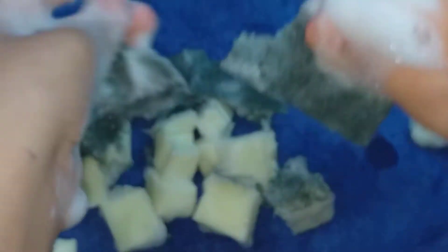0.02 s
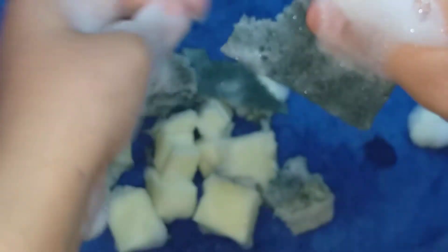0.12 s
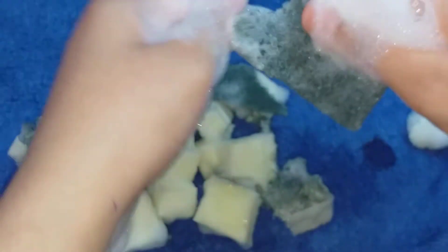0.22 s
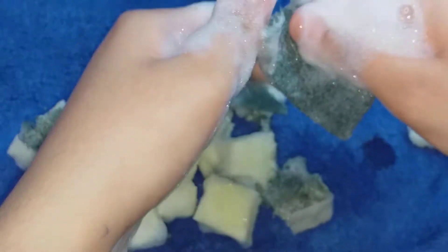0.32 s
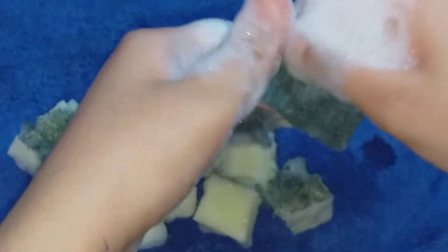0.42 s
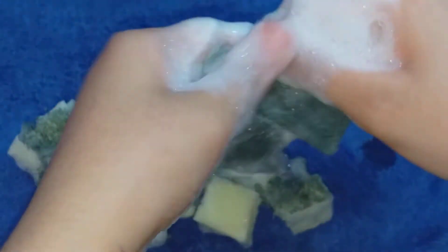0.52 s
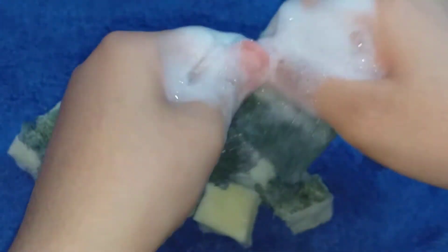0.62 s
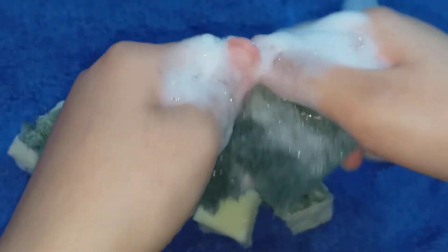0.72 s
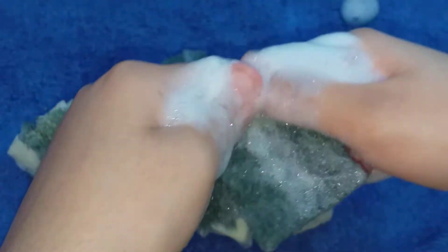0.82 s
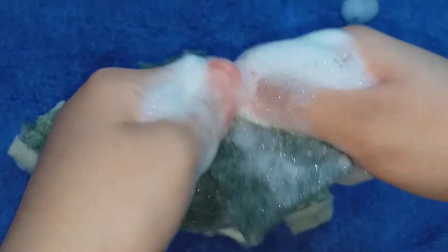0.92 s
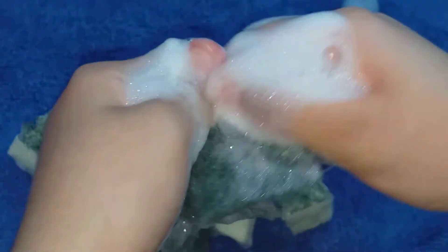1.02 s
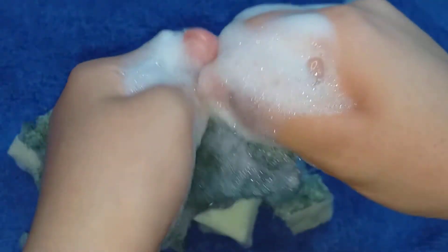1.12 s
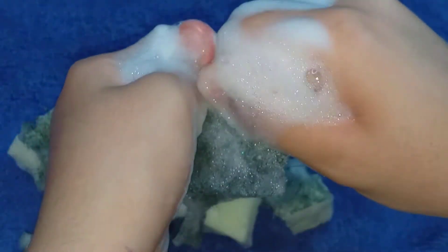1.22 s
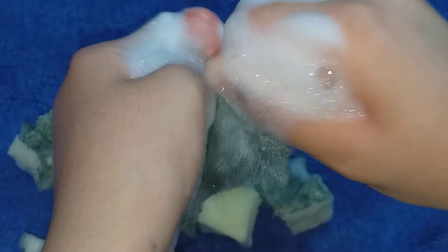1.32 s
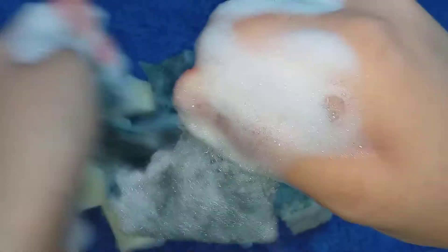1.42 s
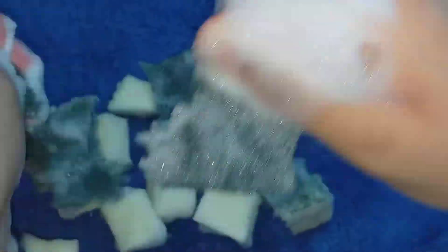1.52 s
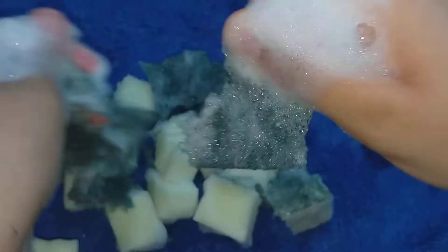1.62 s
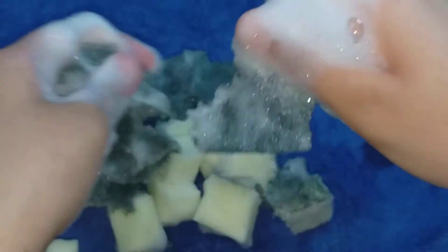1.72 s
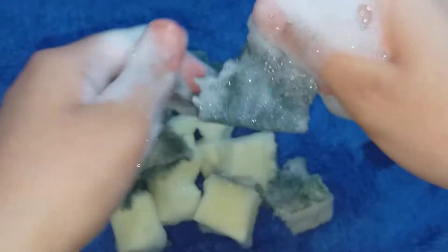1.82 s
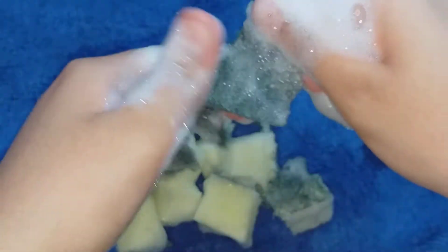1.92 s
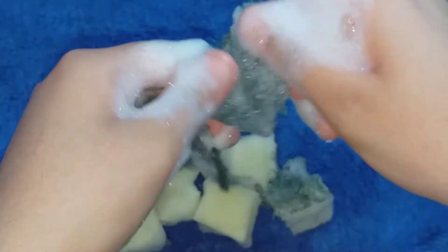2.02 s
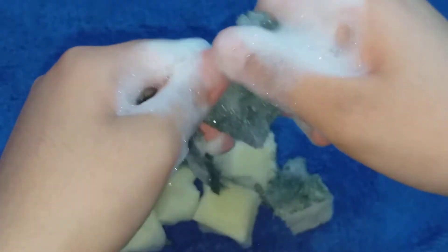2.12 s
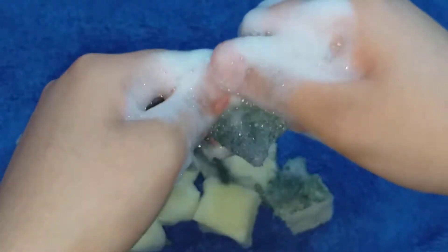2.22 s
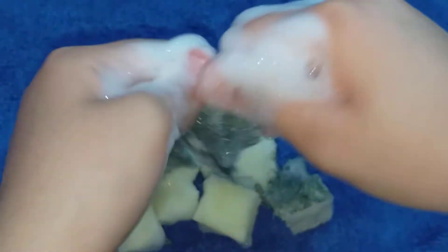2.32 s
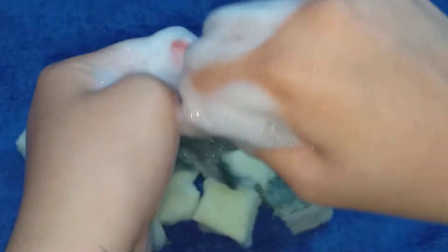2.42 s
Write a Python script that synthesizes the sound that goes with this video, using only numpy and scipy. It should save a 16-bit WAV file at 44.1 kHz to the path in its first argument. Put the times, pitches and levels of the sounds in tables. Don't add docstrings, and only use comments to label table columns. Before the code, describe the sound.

A soapy scouring pad is torn close up. Plastic handling creaks start at once, peaking in a loud clack and thump near 0.28 s, with later creaks at 0.4 and 0.48. Small ticks run from 0.6 to 1.1. Fibres crackle from 1.15, then rip densely at 1.37-1.46, turning brighter. Quiet foam fizz, squishes, low rumble, hiss and faint buzz continue; weak snaps return after 2.35.

```python
import sys
import numpy as np
from scipy import signal
from scipy.fft import rfft, irfft, next_fast_len
from scipy.io import wavfile
from scipy.ndimage import uniform_filter1d, map_coordinates

SR = 44100
rng = np.random.default_rng(int(sys.argv[2]) if len(sys.argv) > 2 else 0)


def boost(x):
    u = np.asarray(x, float) / 20
    return 10 ** u


def master(y):
    cut = np.clip(np.atleast_2d(y).T, -1, 1)
    pcm = np.round(cut * 32767)
    wavfile.write(sys.argv[1], SR, pcm.astype(np.int16))


N = 110250
TIME = np.arange(N) / SR
TOP_HZ = 16000
SILENT_DB = -140

# f/Hz, width/Hz, level/dB
BRIGHT_MODES = [(7010, 350, 11), (8040, 230, 5)]


def unit(x):
    return x / np.sqrt(np.mean(x ** 2) + 1e-20)


def noise():
    return rng.standard_normal(N)


def along(points, hz):
    f, v = np.transpose(points)
    return np.interp(np.log(hz + 1), np.log(f + 1), v)


def curves(rows, off=None):
    s, *columns = np.transpose(rows)
    return [np.interp(TIME, s, column, off, off) for column in columns]


def wobble(rate):
    knots = rng.standard_normal(int(N * rate / SR) + 4)
    return map_coordinates(knots, [np.arange(N) * rate / SR])


def filtered(x, response):
    m = next_fast_len(N + 8192)
    return irfft(rfft(x, m) * response(np.fft.rfftfreq(m, 1 / SR)), m)[..., :N]


def coloured(x, points):
    spectrum = boost(along(points, np.fft.rfftfreq(4096, 1 / SR)))
    cepstrum = irfft(np.log(spectrum + 1e-5))
    cepstrum[1:2048] = 2 * cepstrum[1:2048]
    cepstrum[2049:] = 0
    h = irfft(np.exp(rfft(cepstrum)))
    return signal.fftconvolve(x, h / np.linalg.norm(h))[:N]


def ringing(x, modes):
    def body(f):
        total = 0
        for k, (centre, width, db) in enumerate(modes):
            loss = 1j * f * width
            total = total + (-1) ** k * boost(db) * loss / (centre * centre - f * f + loss)
        return total

    peak = np.abs(irfft(body(np.fft.rfftfreq(8192, 1 / SR)))).max()
    return filtered(x, body) / peak


def hits(times, level_db):
    return np.bincount((times * SR).astype(int), boost(level_db), N)


def grains(rate, spread_db):
    chance, sign, size = rng.random((3, N))
    sizes = boost(-spread_db * np.log(size + 0.0029))
    return unit((chance < rate / SR) * np.sign(sign - .5) * sizes)


def patchy(x, size, db):
    z = signal.stft(x, nperseg=size)[2]
    field = uniform_filter1d(rng.standard_normal(z.shape), size=5, axis=0)
    field = uniform_filter1d(field, size=3, axis=1)
    return signal.istft(z * boost(db * unit(field)), nperseg=size)[1][:N]


def background():
    # t/s, level/dB
    rumble_level = [(0, -69.5), (.7, -70), (1.0, -69), (1.3, -70), (1.9, -73), (2.4, -71)]
    # f/Hz, level/dB per Hz
    rumble_colour = [(25, -33.5), (54, -4.5), (86, -14), (134, 2.5), (172, -11.5), (260, -15), (500, -30.5),
                     (1000, -69)]
    # f/Hz, level/dB per Hz
    hiss_colour = [(300, -15.5), (1500, -14), (6200, -7), (9500, -7.5), (13500, -12), (16000, -7.5)]
    hum_hz, hum_db, hiss_db = 258, -83, -77
    level_db, = curves(rumble_level)
    rumble = boost(level_db + 3 + 2.0 * wobble(5.78)) * unit(coloured(noise(), rumble_colour))
    hum_phase = 2 * np.pi * hum_hz * TIME + .6 * wobble(12)
    hum = boost(hum_db + 1.7 * wobble(3.76)) * np.sin(hum_phase)
    return rumble + hum + boost(hiss_db) * coloured(noise(), hiss_colour)


def buzz():
    # f/Hz, level/dB
    buzz_colour = [(500, -31.5), (1500, -5), (4000, -2), (9000, 0), (12000, 2), (15000, -20)]
    frame_hz, level_db = 59.849, -72
    step_s, first_s, wide_s = .003275, -.00034, .00016
    hz = frame_hz * np.arange(1, int(TOP_HZ / frame_hz))
    starts = first_s + step_s * np.arange(5)
    five = np.exp(-2j * np.pi * hz[:, None] * starts).sum(1)
    edges = 1 - np.exp(-2j * np.pi * hz * wide_s)
    lines = five * edges * boost(along(buzz_colour, hz))
    frame = irfft(np.r_[0, lines], 8192)
    return boost(level_db) * unit(np.interp(TIME * frame_hz % 1, np.arange(8192) / 8192, frame))


def foam():
    # t/s, level/dB
    foam_level = [(0, -67.5), (.6, -70.5), (.95, -72), (1.15, -70), (1.5, -69), (1.72, -70.5),
                  (1.95, -76.5), (2.3, -73.5), (2.46, -69.5)]
    # f/Hz, level/dB per Hz
    fizz_colour = [(180, -34), (300, -9), (961, -5.5), (2400, -5.5), (2880, -5.5), (3580, 0.5),
                   (5900, -10.5), (9390, -1), (16000, -13)]
    # t/s, level/dB, f/Hz, length/s
    squishes = [
        (0.505, -63, 3450, 0.0013),
        (0.586, -75.5, 4100, 0.0041),
        (0.766, -73.5, 2180, 0.012),
        (1.124, -73, 3750, 0.0073),
        (2.164, -77, 2010, .02),
    ]
    sway_db = 1.3
    level_db, = curves(foam_level)
    pops = patchy(grains(4000, spread_db=2.0) + 0.63 * noise(), size=256, db=2.5)
    sway = sway_db * (wobble(17) + wobble(81))
    out = boost(level_db + sway + 1.0) * unit(coloured(pops, fizz_colour))
    for s, db, hz, length in squishes:
        swell = np.exp(-((TIME - s) / length) ** 2 + .5 * wobble(150))
        wet = filtered(pops, lambda f: np.exp(-(np.log(f / hz + 1e-9) / 0.3) ** 2))
        out = out + boost(db) * swell * unit(wet)
    return out


def bursts(times, gains, lengths, count):
    fade = .54
    u = rng.random((len(times), count, 2))
    late = u[..., 0] * (np.arange(count) > 0)
    at = (np.asarray(times)[:, None] + np.asarray(lengths)[:, None] * late) * SR
    size = np.asarray(gains)[..., None] * (0.65 + 0.45 * u[..., 1])
    size = size * (1 - fade * late) * (-1.) ** np.arange(count)
    return [np.bincount(at.astype(int).ravel(), g.ravel(), N) for g in size]


def shell(x, hz):
    wide = [(hz, 1490, 0)]
    narrow = [(hz * 0.93, 260, 0)]
    return ringing(ringing(x, wide), wide) + boost(-13) * ringing(x, narrow)


def creaks():
    # t/s, peak/dB, shell f/Hz, bright ring/dB, hollow ring/dB
    creak_events = [
        (0.0141, -38.5, 4400, 9.5, -5.5),
        (0.0727, -31, 4340, 3, -1),
        (0.1492, -46, 3700, 7, -4.5),
        (0.206, -25.5, 3690, -2, -6),
        (.216, -35, 4400, -17, 3),
        (.275, -14.5, 4630, -12, -6.5),
        (0.28, -12, 4440, -8.5, -17),
        (0.401, -26.5, 4520, -1.5, -6),
        (0.4803, -34, 4100, 0.5, -4.5),
        (0.2817, -22.5, 4500, -8, -20),
    ]
    slip_lengths = [.002, .0025, .001, .0012, .002, .0002, .0002, .0028, .0018, .0003]
    # bright f/Hz, middle hollow level/dB, upper hollow level/dB, crack level/dB
    creak_tones = [(7000, -3.5, 0.5, -18), (7000, -0.5, -2.5, -18), (7100, -1, 2, -13),
                   (6220, -6.5, 2, -14), (7000, -8, -3, -24), (7000, 0, 3, -20), (7500, 0, 3, -9.5),
                   (6200, -3.5, 4, -15), (6970, 4, 0.5, -18), (6892, 0.5, -0.5, -25)]
    # f/Hz, width/Hz
    hollow_modes = [(810, 240), (1420, 260), (2250, 498.5)]
    crack_t60 = 0.0056
    s, db = np.transpose(creak_events)[:2]
    slips = bursts(s, boost(db - 200 * (1 - np.eye(len(s)))), slip_lengths, count=4)
    decay = boost(-60 * np.arange(SR // 20) / SR / crack_t60)
    out = 0
    for x, event, tone in zip(slips, creak_events, creak_tones):
        hz, bright_db, hollow_db = event[2:]
        top_hz, middle_db, upper_db, crack_db = tone
        bright = ringing(x, [(top_hz, *BRIGHT_MODES[0][1:]), BRIGHT_MODES[1]])
        hollow = ringing(x, np.c_[hollow_modes, [0, middle_db, upper_db]])
        crack = signal.fftconvolve(np.abs(x), decay)[:N] * noise()
        out = out + boost(-8) * shell(x, hz) + boost(bright_db) * bright
        out = out + boost(hollow_db) * hollow + boost(crack_db) * crack
    return out


def ticks():
    # t/s, peak/dB, bright ring/dB, hollow ring/dB
    tick_events = [
        (0.6217, -47, -17.5, -4),
        (.689, -59, -6, 4),
        (.698, -55.5, -4, 5.5),
        (.708, -57.5, 1, 7),
        (0.7958, -54.5, -11.5, -1),
        (0.8408, -63, -5, -4),
        (0.887, -53.5, -7.5, -9.5),
        (0.982, -74, -15, 3),
        (1.048, -50, -12, -4),
        (1.0833, -59.5, -21.5, -3),
    ]
    # f/Hz, width/Hz, level/dB
    box_modes = [(997, 92, 3.5), (1460, 210, -13.5)]
    s, db, bright_db, box_db = np.transpose(tick_events)
    slip_s = s * 0 + 0.0013
    body, bright = bursts(s, boost([db, db + bright_db + 14]), slip_s, count=3)
    box = ringing(hits(s, db + box_db + 1), box_modes)
    return boost(-9) * shell(body, 4520) + ringing(bright, BRIGHT_MODES) + box


def thumps():
    # t/s, thump/dB, knock/dB
    rocks = [
        (0.0146, -42.5, -44),
        (.073, -47, -40),
        (.2062, -38, -28),
        (0.2158, -45, -32.5),
        (0.2752, -22, -25),
        (0.2841, -26.5, -42),
        (0.401, -36, -31.5),
        (0.481, -51, -39.5),
        (1.417, -52, -44),
        (1.461, -41.5, -54),
    ]
    s, thump_db, knock_db = np.transpose(rocks)
    thump = ringing(hits(s, thump_db), [(104, 65, 0)])
    return thump - ringing(hits(s, knock_db), [(350, 320, 0)])


def mount():
    rattle = filtered(creaks() + ticks(), lambda f: 1 / (1 + 1j * f / 12400) ** 4)
    return rattle + filtered(thumps(), lambda f: 1 / (1 + 1j * f / 510) ** 2)


def room(x):
    # f/Hz, t60/s
    room_t60 = [(200, 0.083), (2000, 0.32), (10000, 0.17)]
    hz, t, z = signal.stft(rng.standard_normal(SR // 2), SR, nperseg=256)
    fading = z * boost(-60 * t / along(room_t60, hz)[:, None])
    tail = signal.istft(fading, SR, nperseg=256)[1]
    return signal.fftconvolve(x, tail / np.linalg.norm(tail))[:N]


def breaks(rows, t60, gain_db):
    s, db, bright_db = np.transpose(rows)
    decay = boost(gain_db - 60 * np.arange(SR // 30) / SR / t60)
    coarse_shape = signal.fftconvolve(hits(s, db), decay)[:N]
    bright_shape = signal.fftconvolve(hits(s, db + bright_db), decay)[:N]
    clicks = grains(14000, spread_db=1.5)
    return coarse_shape * clicks, bright_shape * unit(clicks + .6 * noise())


def clumps(rate, db):
    return boost(db * wobble(rate))


def stretching():
    # t/s, level/dB
    strain_level = [
        (1.15, -84),
        (1.17, -59),
        (1.184, -64.5),
        (1.205, -53),
        (1.24, -57.5),
        (1.272, -55),
        (1.29, -60),
        (1.355, -69.5),
    ]
    # t/s, level/dB
    grip_level = [(2.33, -85), (2.38, -72), (2.465, -68.5), (2.5, -72)]
    # f/Hz, level/dB per Hz
    weave_colour = [(290, -84), (500, -41), (1330, -6), (2920, -8.5), (4170, 0.5), (5160, -3.5),
                    (6760, -15), (10100, -8), (15000, -45)]
    strain = boost(curves(strain_level, SILENT_DB)[0]) + boost(curves(grip_level, SILENT_DB)[0])
    creep = strain * unit(clumps(350, db=3.5) * grains(3500, spread_db=3.0))
    return coloured(patchy(creep, size=128, db=3.0), weave_colour)


def shaking():
    # t/s, level/dB
    jolt_level = [(1.37, -70), (1.41, -47.5), (1.46, -50), (1.475, -71), (1.5, -65)]
    # f/Hz, level/dB per Hz
    shake_colour = [(50, -12), (120, -7), (280, -5), (500, -7.5), (1000, -1.5), (2000, -46)]
    return boost(curves(jolt_level, SILENT_DB)[0]) * coloured(noise(), shake_colour)


def tearing():
    # t/s, level/dB, bright share/dB
    fibre_snaps = [(1.1389, -59.5, -2), (1.1669, -49, -5), (1.1687, -47, -5), (1.1704, -45, -6),
                   (1.1759, -51, 0), (1.1797, -56, 0), (1.1827, -54, -2), (1.1924, -45, -2),
                   (1.1965, -45, -2), (1.2008, -38, -13), (1.2082, -36.5, -9), (1.2101, -42, -9),
                   (1.2139, -43, -10), (1.2166, -48, -9), (1.2211, -49, -2), (1.2231, -40, -3),
                   (1.2264, -48, -12), (1.23, -44, -5), (1.2323, -50, -4), (1.2364, -48, -6),
                   (1.2394, -51, -7), (1.2442, -49, -7), (1.2456, -46, -12), (1.249, -41.5, -6),
                   (1.2507, -47, -7), (1.2624, -54, -2), (1.2653, -48, -7), (1.2683, -38.5, -15),
                   (1.2722, -37, -10), (1.2743, -43, -3), (1.2929, -42, -11), (1.3044, -54, -7),
                   (1.31, -40, -10), (1.3158, -51, -4), (1.3256, -46, -2.5), (1.3627, -42, -4.5),
                   (2.3587, -66, -3), (2.3673, -59, -6), (2.4289, -59, 5), (2.4315, -51.5, -7),
                   (2.4384, -54, -7), (2.4518, -63, -3), (2.4631, -48, -11), (2.4684, -50, -6),
                   (2.4955, -63, 3)]
    # t/s, level/dB, bright share/dB
    bundle_tears = [(1.3732, -30, -9), (1.3771, -27.5, -9), (1.3801, -25.5, -16), (1.3838, -25, -8),
                    (1.3867, -25.5, -11), (1.3919, -28, -10), (1.3944, -29, -4), (1.3984, -30, -5),
                    (1.4031, -28.5, -13), (1.4061, -36, 7), (1.409, -29, -5), (1.4104, -30, 0),
                    (1.4136, -32, -9), (1.4164, -27.5, 1), (1.4185, -32.5, -5), (1.4211, -33, 5),
                    (1.4231, -36, 2), (1.4251, -34, 4), (1.4272, -36.5, 4), (1.4291, -41, 8),
                    (1.4351, -39, 10), (1.4384, -33, 4), (1.4405, -33.5, 10), (1.4426, -29, -2),
                    (1.4469, -31, 2), (1.4509, -37.5, 5), (1.4522, -34.5, 0), (1.4552, -34, 4),
                    (1.4578, -35, 1), (1.461, -32.5, 1)]
    # t/s, level/dB, bright share/dB
    rip_level = [
        (1.366, -75, -10),
        (1.3685, -39, -7),
        (1.372, -43, -10),
        (1.385, -35, -12),
        (1.4, -38, -5),
        (1.422, -40.5, 3),
        (1.444, -43, 6),
        (1.461, -42.5, 5),
        (1.464, -71, 1),
    ]
    # f/Hz, level/dB per Hz
    snap_colour = [(500, -37), (1300, -8), (2700, -8), (4100, -1), (5300, -4.5), (9000, -40)]
    pad_colour = [(400, -30.5), (900, -18), (1500, -3), (2300, -5), (2850, -10), (3500, -1), (5000, -5.5),
                  (7500, -26.5)]
    fibre_colour = [(4500, -34), (6700, -12.5), (7600, -2), (10800, 0.5), (12200, -10), (16000, -30)]
    rip_db, thin_db = curves(rip_level, SILENT_DB)
    crackle = grains(7000, spread_db=2) + .4 * noise()
    rip = unit(patchy(clumps(350, db=1.5) * crackle, size=128, db=1))
    fine = unit(clumps(450, db=2.5) * grains(9000, spread_db=0) + 0.84 * rip)
    snaps, thin_snaps = breaks(fibre_snaps, t60=0.0067, gain_db=-1)
    tears, thin_tears = breaks(bundle_tears, t60=0.012, gain_db=-4)
    coarse = coloured(snaps, snap_colour) + coloured(boost(rip_db) * rip + tears, pad_colour)
    thin = coloured(boost(rip_db + thin_db) * fine + thin_snaps + thin_tears, fibre_colour)
    return stretching() + shaking() + coarse + thin


def scene():
    pad = tearing()
    echo = boost(-16.5) * room(pad)
    return (background() + buzz() + foam() + mount() + echo + pad)[None]


def band_limit(x):
    return signal.sosfilt(signal.butter(12, 16490, fs=SR, output="sos"), x)


def record(dry):
    low_hz = 47.7
    band = lambda hz: (hz < TOP_HZ) * (1j * hz / (low_hz + 1j * hz)) ** 2
    return band_limit(filtered(dry, band))


dry = scene()
out = record(dry)
master(out)
```